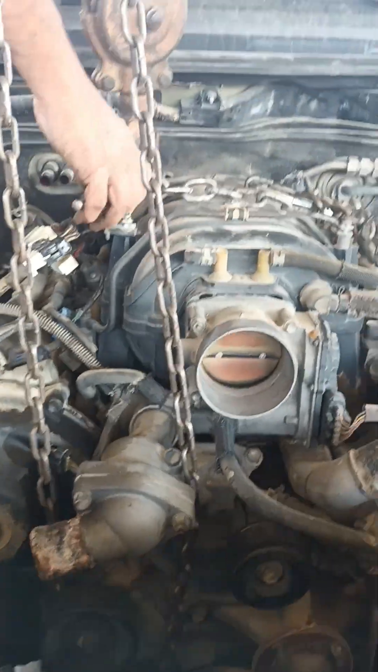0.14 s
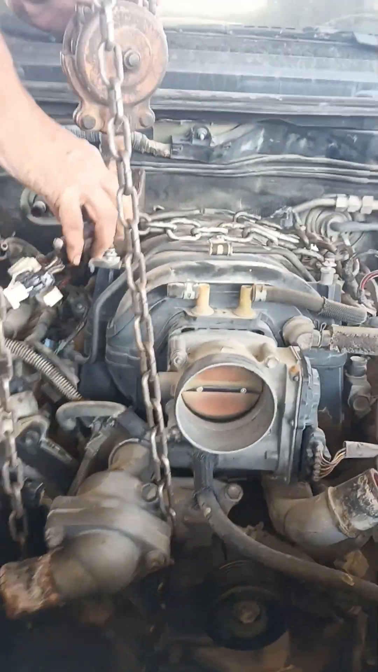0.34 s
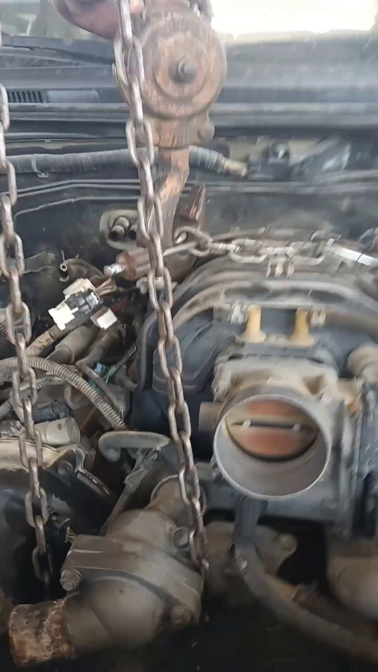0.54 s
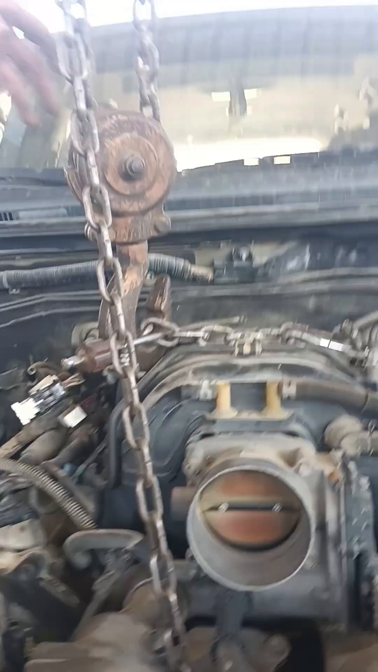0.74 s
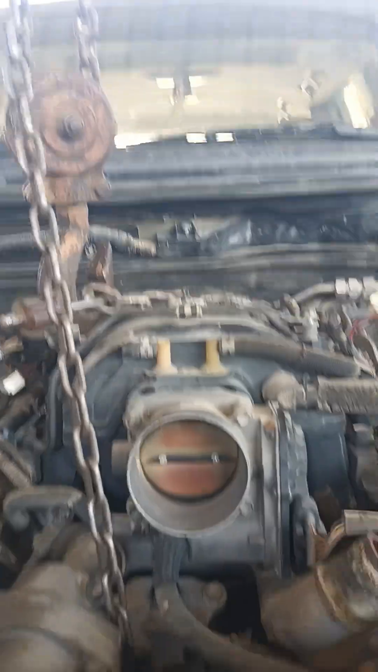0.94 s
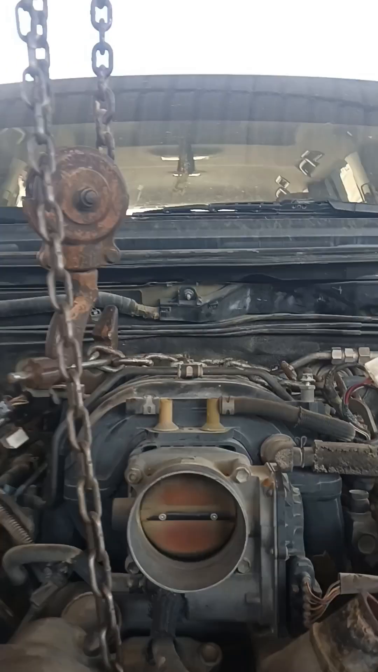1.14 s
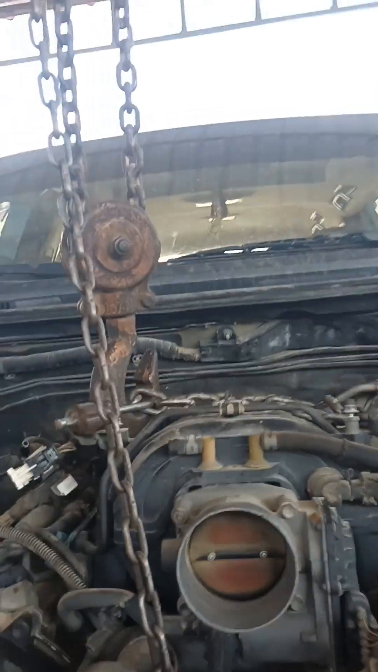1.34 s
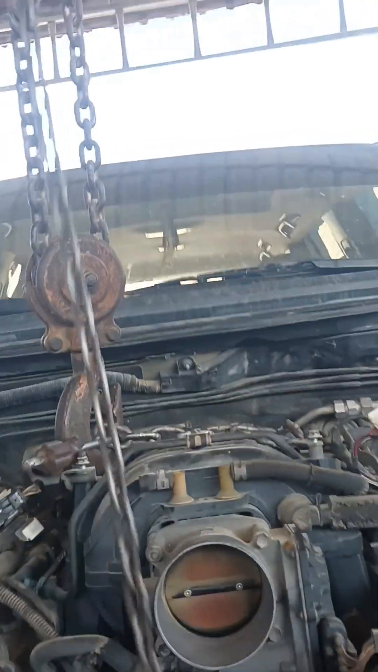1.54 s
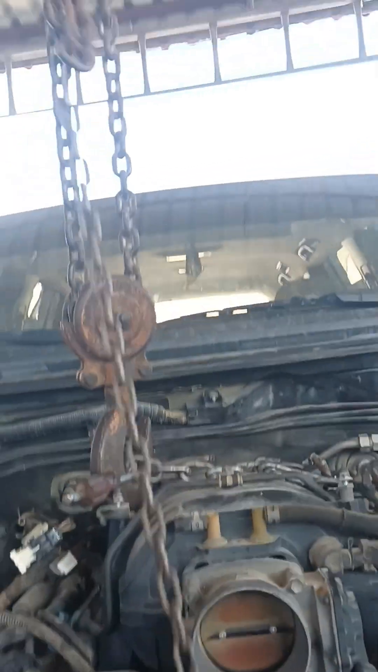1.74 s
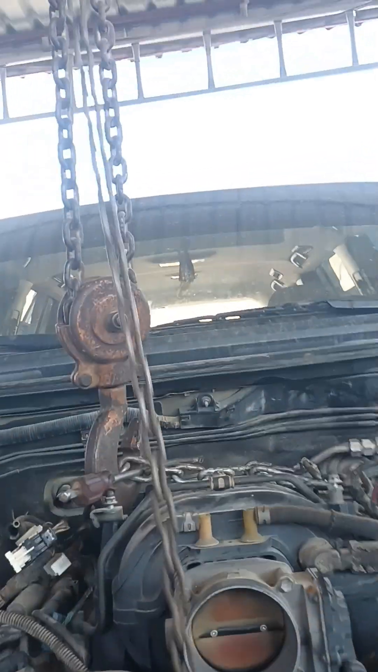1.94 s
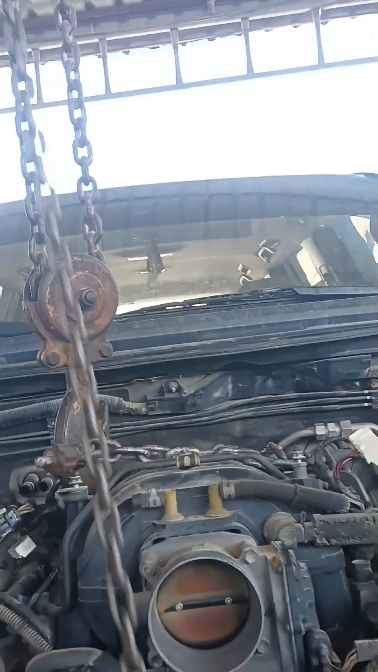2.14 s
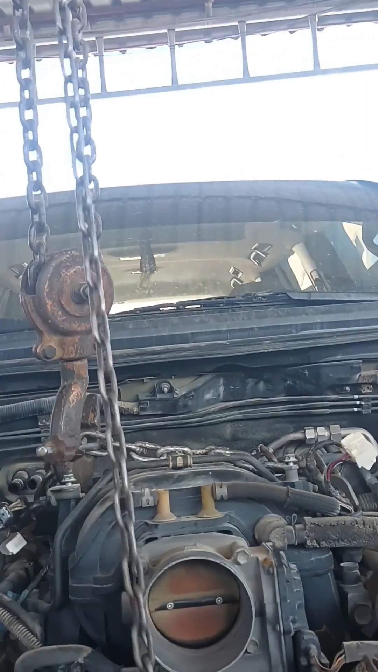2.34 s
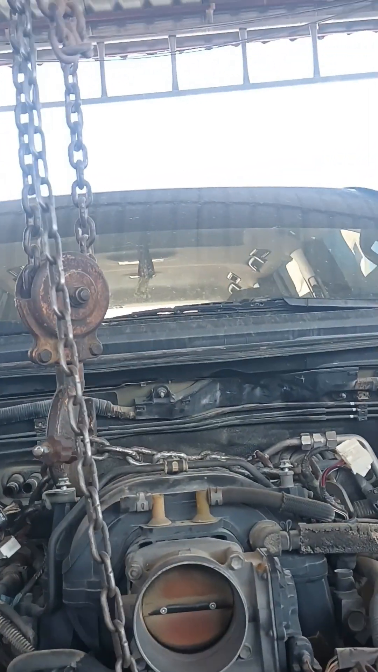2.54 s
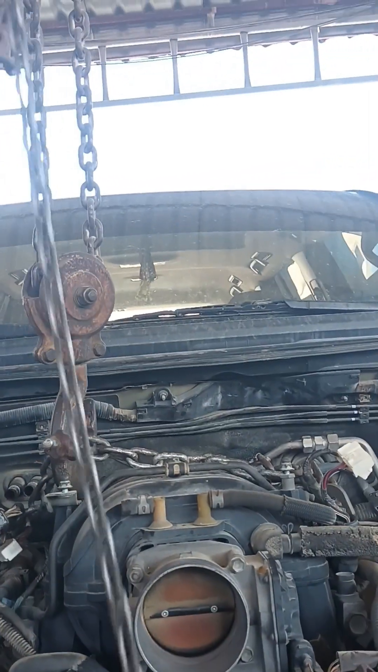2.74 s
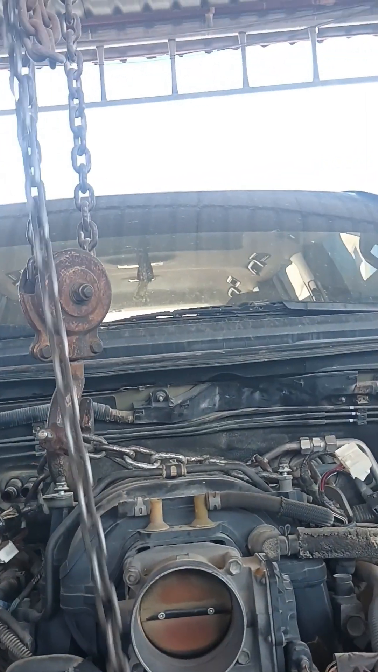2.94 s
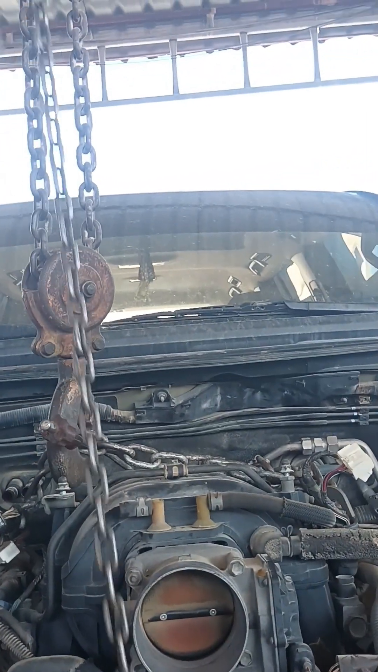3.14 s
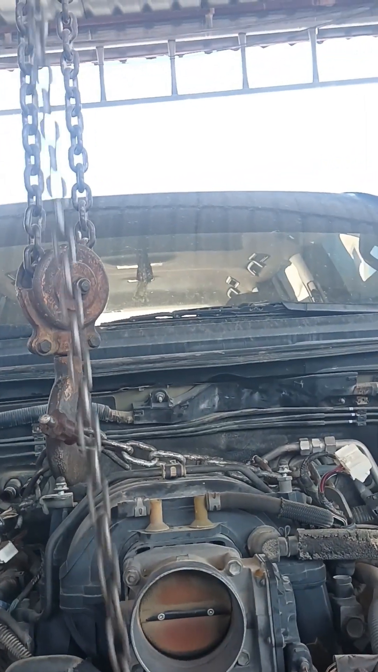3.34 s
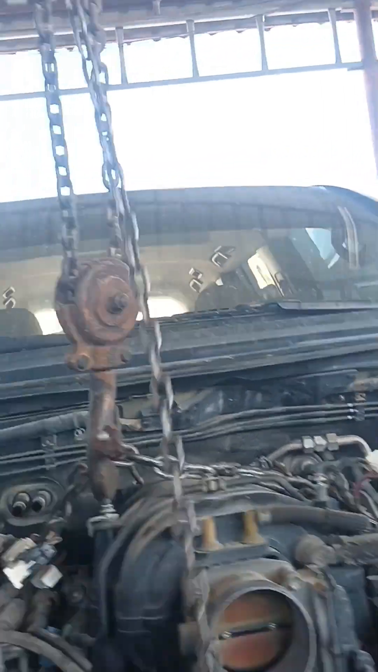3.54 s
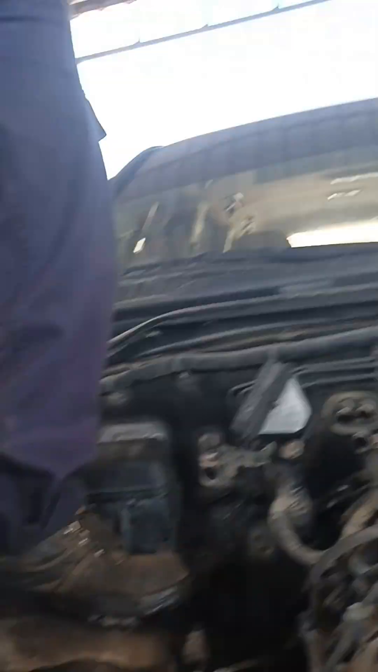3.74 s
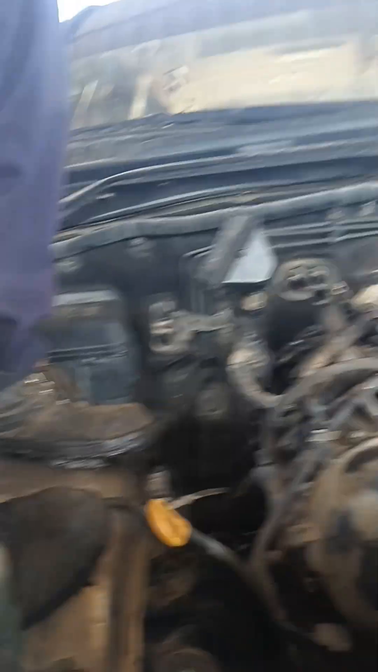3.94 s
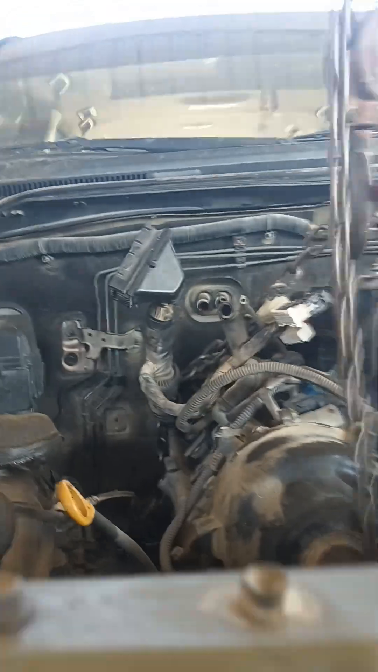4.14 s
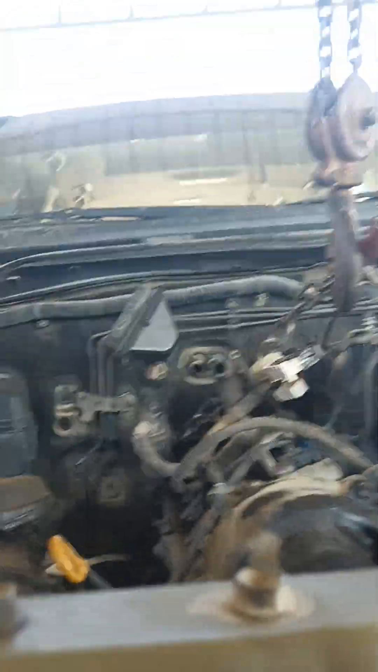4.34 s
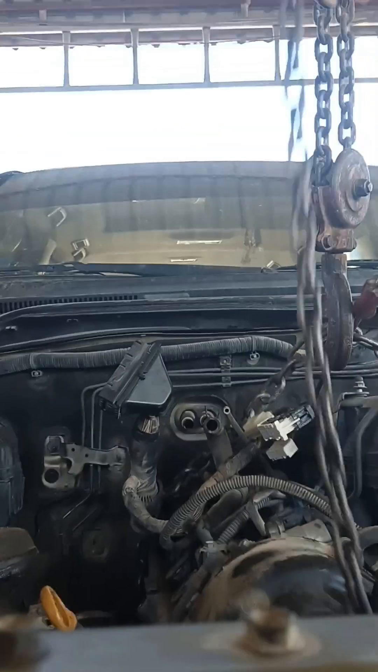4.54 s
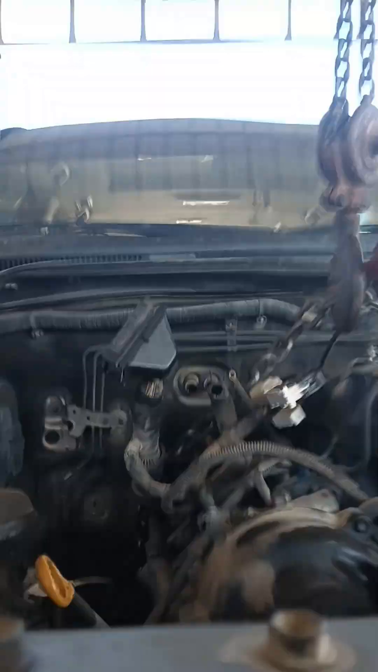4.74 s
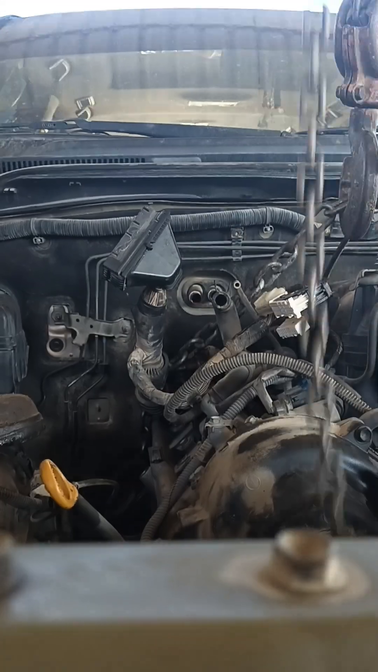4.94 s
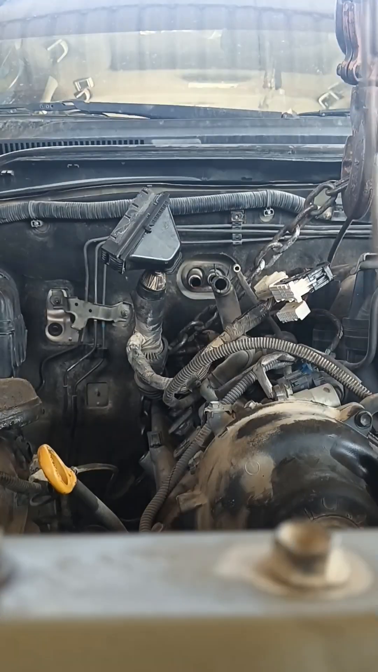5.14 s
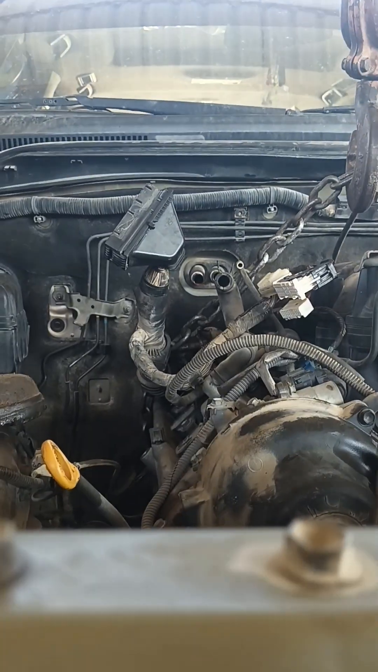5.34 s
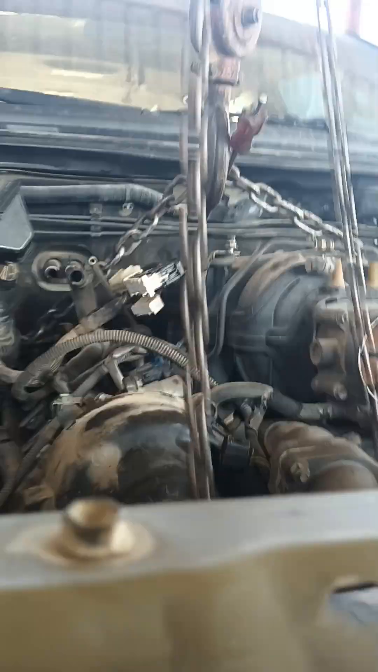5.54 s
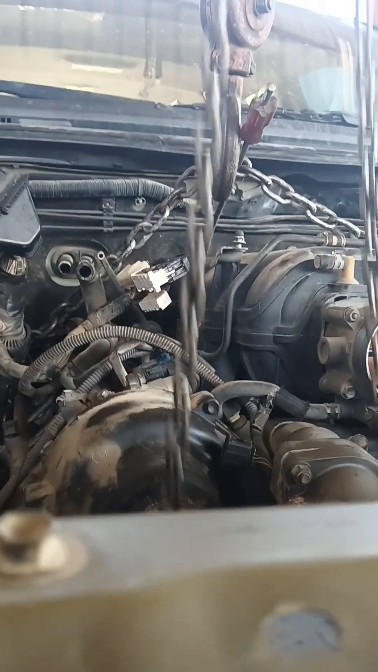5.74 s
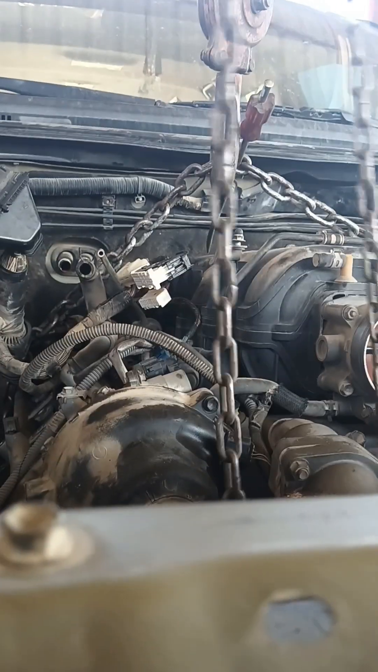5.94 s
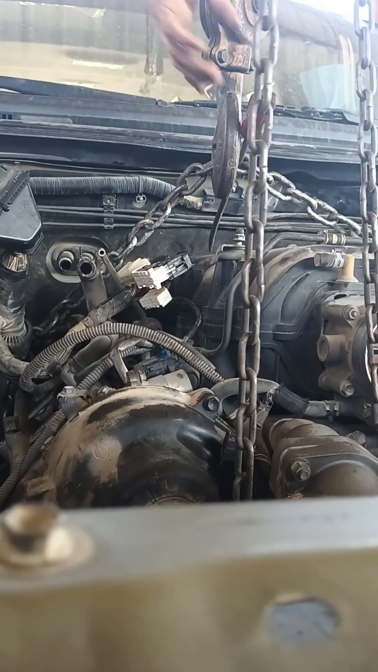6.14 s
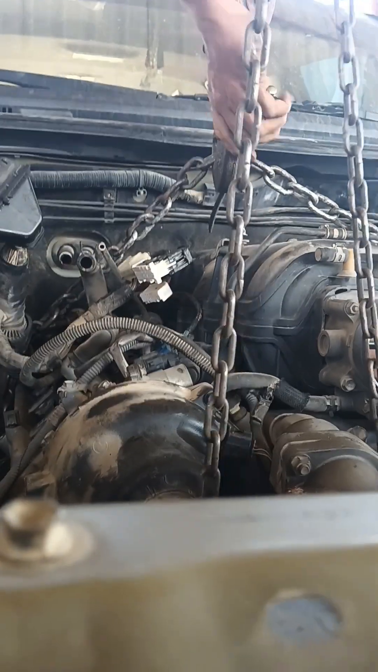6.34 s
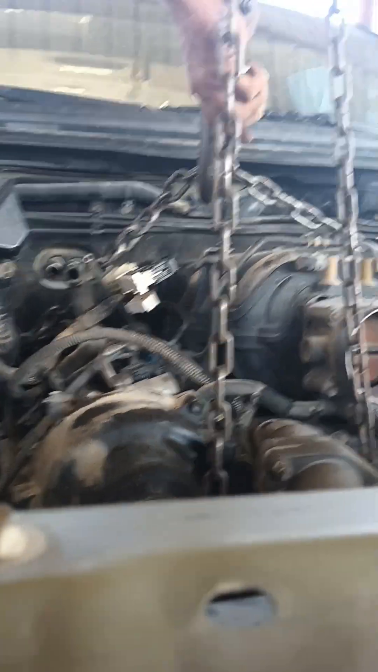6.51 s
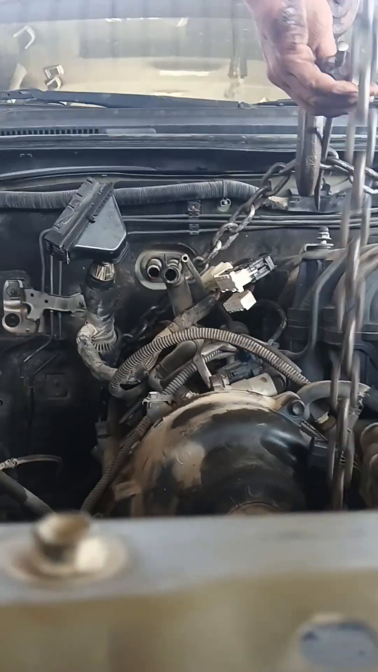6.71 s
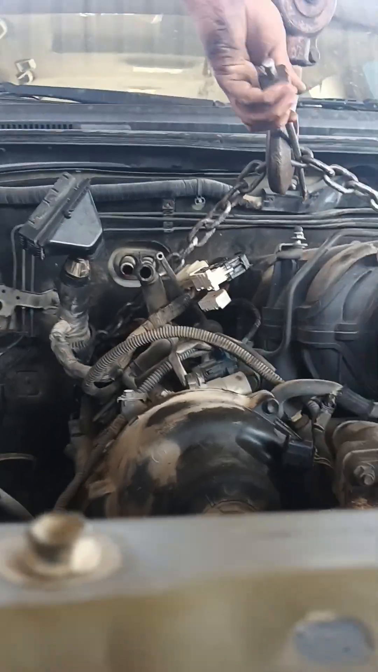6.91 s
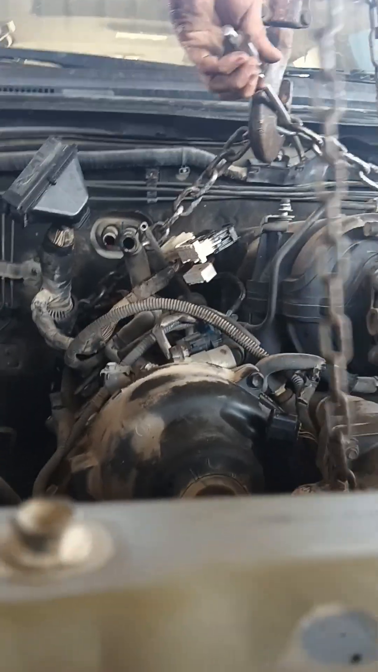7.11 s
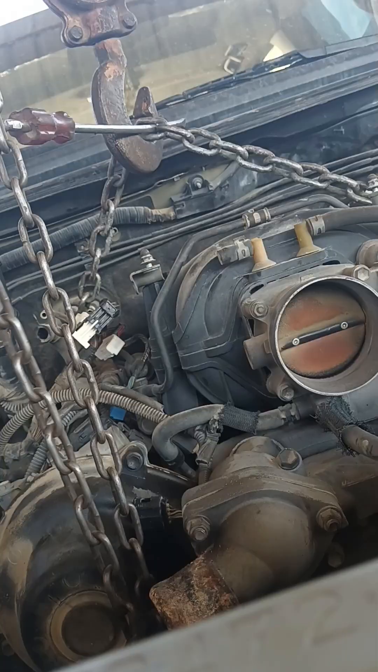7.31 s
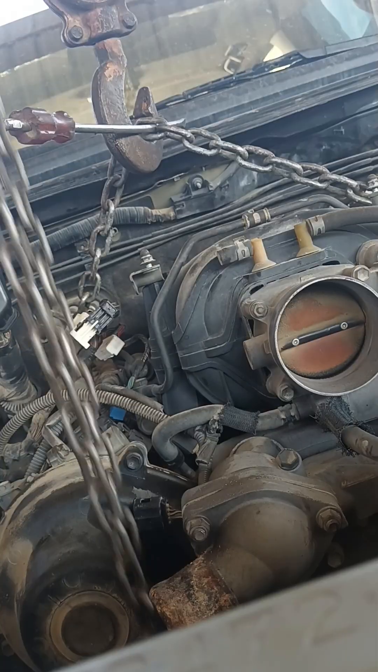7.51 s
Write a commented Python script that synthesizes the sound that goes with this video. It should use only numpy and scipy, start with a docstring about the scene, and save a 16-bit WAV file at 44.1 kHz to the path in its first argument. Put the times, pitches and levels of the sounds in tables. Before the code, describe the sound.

Close stereo sound in a hard, tin-roofed workshop, faint air noise beneath, most metal leaning left. From 0 to 0.9 s it is nearly quiet: a tiny link snap, a soft scrape, a faint knock. Around 0.9-1.3 s links snap and a hollow clack with a low thump lands near 1.17. From 1.4 to 2.1 s loose chain jingles, steel rings and the engine is knocked. Between 2.2 and 6 s uneven pulls, roughly three or four a second, bring dense rattling, boxy housing boom, bright jingling, hard clinks and thin high ratchet pings. Strong, clear steel rings bloom at 4.43 and 4.96 s; hollow clacks cluster at 5.45-5.65. After 6 s it falls away to a knock at 6.39, light scrapes, and pings and clinks at 6.7-7.15. Complete silence from 7.19 to 7.41, then air returns with a sharp double clink at 7.53-7.57 and light jingling.

```python
"""In a tin-roofed workshop, a hand chain hoist is hauled over an open engine bay.
Each pull drags the chain through the hoist: random link collisions set housing and guide clattering.
Loose links jingle, snap and scrape as decaying modes and short noise; struck steel and the pawl ring.
Chain and hook knock on the engine with hollow clacks and low thumps, over near echoes and faint air noise.
Near the end the sound breaks off for a moment."""
import sys
import numpy as np
from scipy import signal
from scipy.fft import rfft, irfft, next_fast_len
from scipy.io import wavfile
from scipy.ndimage import uniform_filter1d

SR = 44100
rng = np.random.default_rng(int(sys.argv[2]) if len(sys.argv) > 2 else 0)


def master(y):
    """Save y as 16-bit WAV."""
    cut = np.clip(np.atleast_2d(y).T, -1, 1)
    pcm = np.round(cut * 32767)  # scale
    wavfile.write(sys.argv[1], SR, pcm.astype(np.int16))


N = 338247
TIME = np.arange(N) / SR
SLOW_TIME = TIME[::50]  # coarse clock for slow gains
TAIL, LONG_TAIL = TIME[:SR // 7], TIME[:SR // 2]
BLOW_VARIETY_DB = 1.5  # spread of a mode's level from blow to blow

# colour of loose links touching: (frequency [Hz], relative level per Hz [dB])
LINK_COLOUR = [(1500, -16.5), (3200, -8.5), (4400, -9.5), (5400, -6.5), (6400, -3), (7300, -3),
               (8200, -13.5), (9200, 0), (10200, 0), (11300, -5), (13000, -16), (14000, -18), (15000, -12),
               (16000, -11.5)]


def pulling():
    """A jerk sets the links jingling; guide and housing go on while the hand hauls. Gives effort and three gains."""
    # pulls on the chain, and at 2.995 s a knock that shakes it the same way: (time [s], rise [s], hold [s],
    # then relative levels of rattle [dB], housing boom [dB], link jingle [dB])
    pulls = [(2.211, 0.036, 0.019, -37, -44, -43), (2.453, 0.023, .08, -30.5, -29.5, -30.5),
             (2.769, 0.0075, 0.11, -32, -39.5, -30.5), (2.995, .03, 0.037, -43.5, -62.5, -45),
             (3.328, 0.053, 0.079, -34.5, -38, -33.5), (3.691, 0.04, 0.051, -36, -39.5, -35.5),
             (3.868, 0.023, 0.023, -40.5, -58, -40), (4.007, 0.0093, 0.14, -31.5, -33.5, -30.5),
             (4.262, 0.023, 0.052, -33, -33.5, -38), (4.517, 0.017, 0.092, -33, -34, -32),
             (4.759, 0.014, 0.062, -33, -32.5, -35), (5.014, 0.01, 0.078, -33.5, -31.5, -35),
             (5.407, 0.058, 0.07, -35, -25.5, -40), (5.581, .012, 0.086, -35.5, -33, -31),
             (5.905, .012, .065, -33, -31, -32)]
    rattle_fall, boom_fall, jingle_fall = 171.5, 159.5, 189.5  # dB per s
    boom_lag = 0.0083  # s; the heavy housing takes longer to get going
    efforts, rattles, booms, jingles = [], [], [], []
    for s, rise, hold, rattle_db, boom_db, jingle_db in pulls:
        effort = swell(s, rise, hold, rattle_fall)
        efforts.append(effort)
        rattles.append(from_db(rattle_db) * effort)
        booms.append(from_db(boom_db) * swell(s, rise + boom_lag, hold - boom_lag, boom_fall))
        jingles.append(from_db(jingle_db) * swell(s, rise, 0, jingle_fall))
    return [together(swells) for swells in (efforts, rattles, booms, jingles)]


def swaying():
    """The slack chain swings and feeds on, then settles. Gives the gains of rattle, jingle and taut link."""
    # swings of the slack chain: (time [s], length [s], then relative levels of
    # rattle [dB], link jingle [dB], taut link [dB])
    sways = [(0.024, 0.069, -66.5, -92, -90), (0.361, .15, -61, -63, -85), (0.548, 0.093, -71, -66.5, -82),
             (0.838, 0.13, -56.5, -70, -72), (0.991, 0.24, -56, -69.5, -67.5),
             (1.396, 0.58, -45.5, -40, -51.5), (1.987, 0.14, -49, -53, -64), (2.125, 0.22, -51, -45, -52),
             (2.631, 0.48, -44.5, -43.5, -45.5), (3.186, 0.33, -50, -46, -49),
             (3.583, 0.087, -42.5, -49, -36.5), (3.772, 0.25, -43.5, -47.5, -47),
             (4.143, 0.25, -42, -45.5, -35), (4.598, 0.38, -47, -49, -44), (5.15, 0.24, -47, -48, -40.5),
             (5.613, 0.12, -50, -44.5, -30), (5.774, 0.22, -58.5, -54, -72), (6.12, .17, -69.5, -71, -90),
             (6.672, 0.32, -54, -50.5, -47.5), (7.4, 0.067, -62.5, -90, -85),
             (7.482, 0.2, -41, -42.5, -45.5)]
    rise, fall = 0.031, 419  # s, dB per s
    starts, lengths, *levels = np.transpose(sways)
    shapes = np.array([swell(s, rise, length - rise, fall) for s, length in zip(starts, lengths)])
    return [together(from_db(db)[:, None] * shapes) for db in levels]


def housing(run):
    """The hoist's steel housing booms at its low resonances under the running chain."""
    # resonances of the housing: (frequency [Hz], width [Hz], relative level [dB])
    housing_modes = [(312, 24, -15), (356, 20, -8), (435, 20, -5), (514, 16, 8), (662, 27, -9),
                     (790, 30, -11), (1020, 35, -14)]
    # broad colour of its clatter: (frequency [Hz], relative level per Hz [dB])
    boom_colour = [(100, -14), (200, -11.5), (310, 2.5), (520, -3.5), (800, -2.5), (1100, -26), (1600, 2),
                   (3000, -59)]
    return body(run, boom_colour, housing_modes, t60=0.049, ring_db=7.5, alike=0.63, vary_db=5.0, low_hz=203)


def guide(run):
    """The chain guide answers the same collisions higher up, as a rattle."""
    # resonances of the guide: (frequency [Hz], width [Hz], relative level [dB])
    guide_modes = [(1511, 24, -1.5), (1609, 24, 1.5), (1808, 22, 2.5), (2050, 55, -13.5), (2093, 55, -1),
                   (2253, 51, 1.5), (2506, 25, -5), (2890, 81, -7.5), (2826, 34, 2), (4900, 41, 3),
                   (7520, 90, -7)]
    # broad colour of its clatter: (frequency [Hz], relative level per Hz [dB])
    rattle_colour = [(500, 3), (900, 2), (1200, -3.5), (1700, 3), (3000, 3), (3800, 1), (5000, -3.5),
                     (6500, 0.5), (8200, -35.5), (10000, -9), (16000, -57)]
    return body(run, rattle_colour, guide_modes, t60=0.033, ring_db=-1.0, alike=0.03, vary_db=5.0, low_hz=480)


def body(clicks, colour, resonances, t60, ring_db, alike, vary_db, low_hz, count=9):
    """A steel part under the chain; as the point of contact wanders, its clatter and resonances shift."""
    out = 0
    place = np.cumsum(rng.random(N) < 25 / SR) % count  # moves about 25 times a second
    for k in range(count):
        clatter = rms_one(noise(colour, len(TAIL), alike) * decay(t60))
        ring = 0
        for hz, width, db in resonances:
            strength = from_db(db + vary_db * rng.normal()) * width
            ring_t60 = np.log(1000) / (np.pi * width)  # a narrow resonance rings longer
            ring = ring + strength * mode(hz + width * rng.normal() / 10, ring_t60)
        response = high_pass(clatter + from_db(ring_db) * rms_one(ring), low_hz)
        out = out + struck(clicks * (place == k), rms_one(response))
    return evened(out)


def jingle(per_s, spread_db, t60, tick_t60, tick_db, count=20):
    """Loose links chatter by turns; each has its own high modes and a hard tick."""
    out = 0
    colour_hz, colour_db = np.transpose(LINK_COLOUR)
    clicks = contacts(per_s, spread_db)
    touching = (np.cumsum(rng.random(N) < 40 / SR) + rng.integers(2, size=N)) % count
    for link in range(count):
        ring = 0
        for hz in np.linspace(3800, 15000, count) + rng.uniform(-300, 297, count):
            level_db = np.interp(hz, colour_hz, colour_db) + 3.8 * rng.normal()
            ring = ring + from_db(level_db) * mode(hz, t60)
        tick = noise(LINK_COLOUR, len(TAIL)) * decay(tick_t60)
        response = high_pass(rms_one(ring) + from_db(tick_db) * rms_one(tick), 1300)
        out = out + struck(clicks * (touching == link), response)
    return evened(out)


def clinks(strays, others_db, tick_db, tick_t60, rise):
    """A hard snap of two links: a tick, one strong mode and weaker ones around it."""
    # single links snapping together: (time [s], relative level [dB], strongest pitch [Hz])
    snaps = [(0.154, -39, 7330), (0.9176, -25.5, 4490), (0.9533, -20.5, 6260), (1.0153, -24.5, 6200),
             (1.0384, -27.5, 4410), (1.1353, -30.5, 5970), (1.2416, -41, 6760), (1.458, -22, 3400),
             (2.0193, -24.5, 3330), (2.0552, -25, 4350), (2.3234, -18, 3270), (2.7766, -16.5, 7520),
             (2.9117, -18.5, 7000), (3.241, -28, 7160), (3.501, -20, 4470), (3.625, -28, 4500),
             (3.6449, -14.5, 6240), (3.659, -20.5, 6420), (3.7046, -15, 6250), (3.7194, -17, 4900),
             (3.8015, -25, 6370), (3.8407, -26.5, 6390), (3.939, -21.5, 4470), (3.8803, -20, 6260),
             (4.6462, -20.5, 4470), (4.6865, -19, 5900), (4.7393, -19, 6390), (4.9418, -18.5, 5870),
             (5.1775, -21.5, 5970), (5.2235, -18, 4470), (5.2484, -19.5, 6220), (5.326, -22, 7400),
             (5.4522, -21.5, 6020), (5.5863, -19.5, 4470), (5.6885, -21, 4470), (6.4698, -38, 6230),
             (6.733, -37.5, 3420), (6.9205, -25, 7300), (6.968, -28, 3180), (7.001, -29, 4470),
             (7.5335, -14.5, 6250), (7.572, -16.5, 6370)]
    t60 = 0.044  # s
    out = np.zeros((2, N))
    for s, db, hz in list(snaps) + strays:
        pitches = (hz, 4450, 6300, 7200, 10100, 10800)
        others = sum(mode(f * rng.uniform(0.93, 1.03), t60) for f in pitches)
        tick = noise(LINK_COLOUR, len(TAIL)) * decay(tick_t60)
        snap = mode(hz, t60) + from_db(others_db) * others + from_db(tick_db) * tick
        add(out, s, from_db(db) * snap * build_up(rise))
    return out


def stray_clinks(sway, per_s=9, level_db=17.5, spread_db=-0.5, low_hz=2987, high_hz=6490):
    """Chance snaps, as strong as the chain swings: rows of (time [s], relative level [dB], pitch [Hz])."""
    at = np.flatnonzero(rng.random(N) < per_s / SR)
    strength, pitch = rng.random((len(at), 2)).T
    db = 20 * np.log10(sway[at] + 1e-9) + level_db + spread_db * (2 * strength - 1)
    return list(zip(at / SR, db, low_hz * (high_hz / low_hz) ** pitch))


def taut_link():
    """One taut link sings as its neighbours chafe it."""
    # modes of the taut link: (frequency [Hz], relative level [dB], t60 [s])
    taut_modes = [(4455, -12, 0.36), (4470, 9, 0.09), (6260, -8, .09), (6370, -4.5, .08)]
    return singing(taut_modes, per_s=45, spread_db=10.5, size=4500)


def load_hook():
    """The load hook sings while the chain chafes it."""
    # modes of the hook: (frequency [Hz], relative level [dB], t60 [s])
    hook_modes = [(3361, 0, .48), (5620, -13, .4), (7955, -20, .4)]
    # spells of chafing: (time [s], length [s], relative level [dB])
    chafes = [(1.383, 0.57, -44.5), (2.734, 0.24, -42.5), (4.428, .25, -34), (4.94, .14, -41)]
    rise, fall = 0.034, 173  # s, dB per s
    gain = together([from_db(db) * swell(s, rise, length - rise, fall) for s, length, db in chafes])
    return gain * singing(hook_modes, per_s=26, spread_db=8, size=1500)


def singing(modes, per_s, spread_db, size):
    """Light random touches keep a part's modes alive; the level is evened over size samples."""
    response = sum(from_db(db) * mode(hz, t60, LONG_TAIL) for hz, db, t60 in modes)
    response = response * build_up(0.00087, LONG_TAIL)
    return evened(struck(contacts(per_s, spread_db), response), size)


def ringing_steel():
    """Blows on the solid steel of the hoist excite its modes."""
    # blows: (time [s], relative level [dB], build-up [s], t60 [s])
    blows = [(1.402, -26.5, 0.013, 0.19), (1.540, -25.5, 0.00066, 0.67), (1.586, -21, 0.0011, 0.28),
             (1.76, -25.5, 0.012, 0.31), (1.805, -29.5, 0.0018, 0.24), (1.915, -23, 0.004, 0.13),
             (2.673, -35, 0.0035, 0.35), (2.732, -28.5, 0.0026, 0.15), (3.281, -18.5, 0.007, 0.078),
             (3.801, -23, 0.0009, 0.023), (4.4205, -13, 0.0023, 0.067), (4.445, -6, 0.058, 0.14),
             (4.955, -6.5, 0.029, 0.12)]
    # modes: (frequency [Hz], relative level [dB], ring time [multiple of the blow's t60], build-up [s])
    steel_modes = [(3361, -8, 1.8, .05), (5620, -6, 1.2, .001), (5873, 0, .9, .001), (5940, -9, .5, .001),
                   (7184, -13, 1, .001), (7955, -15, 1.3, .001), (8937, -16, .9, .001),
                   (12320, -24, 1, .001), (15055, -21, .8, .001)]
    return ringing(blows, steel_modes, BLOW_VARIETY_DB, flutter_db=2.5)


def pawl_pings():
    """The small hard pawl of the ratchet pings in a tight cluster of high modes."""
    # pings: (time [s], relative level [dB], t60 [s])
    ping_blows = [(1.4551, -23.5, 0.075), (2.131, -18, 0.11), (2.177, -16.5, 0.083), (2.2084, -18.5, 0.15),
                  (2.3565, -20.5, 0.11), (2.7387, -17, 0.1), (2.9617, -18.5, 0.083), (3.1288, -19, 0.17),
                  (3.5648, -16, 0.13), (3.7793, -20, 0.14), (3.8437, -18.5, 0.093), (4.812, -27, 0.27),
                  (4.8694, -24, 0.13), (5.1402, -18, 0.11), (5.1801, -22, 0.15), (5.3627, -20, 0.25),
                  (5.3994, -20.5, 0.12), (5.8122, -28.5, 0.26), (6.2856, -28, .049), (6.7244, -20, 0.08),
                  (6.777, -27.5, 0.45), (6.8239, -22.5, 0.096), (6.8748, -22, 0.11), (6.9406, -23.5, 0.11),
                  (7.1774, -29.5, .12)]
    # modes: (frequency [Hz], relative level [dB], ring time [multiple of the blow's t60], build-up [s])
    pawl_modes = [(9300, -1.5, 1, .001), (9390, -6.5, .5, .001), (9640, -5, 1, 0.00035),
                  (10260, -11.5, .8, 0.00034)]
    rise = 0.0062  # s
    blows = [(s, db, rise, t60) for s, db, t60 in ping_blows]
    return ringing(blows, pawl_modes, BLOW_VARIETY_DB, flutter_db=6)


def ringing(blows, modes, vary_db, flutter_db):
    """Struck steel rings on with a fluttering level; each blow weights the modes differently."""
    out = np.zeros((2, N))
    for s, db, rise, t60 in blows:
        t = LONG_TAIL[LONG_TAIL < 2 * t60]
        for hz, level, sustain, mode_rise in modes:
            flutter = np.cos(2 * np.pi * rng.uniform(14, 40) * t)
            strength = from_db(db + level + vary_db * rng.normal() + flutter_db * flutter)
            onset = build_up(rise, t) * build_up(mode_rise, t)
            add(out, s, strength * onset * mode(hz, t60 * sustain, t))
    return out


def knocks(rise, alike, thump_t60, tone_db, tone_sustain):
    """Covers and hoses answer a blow with a short, hollow clack, the engine with a thump."""
    # knocks of chain and hook on the engine: (time [s], relative clack level [dB], pitch [Hz],
    # t60 [s], relative thump level [dB], thump pitch [Hz])
    blows = [(0.308, -42.5, 339, 0.14, -56, 150), (0.938, -38, 750, 0.11, -72, 150),
             (1.064, -23, 757, 0.1, -54.5, 120), (1.174, -14.5, 1022, 0.034, -25.5, 127),
             (1.361, -28.5, 318, 0.025, -36, 177), (1.658, -29.5, 696, 0.19, -27.5, 240),
             (1.679, -19.5, 497, 0.025, -37, 198), (1.732, -32, 534, 0.066, -66, 230),
             (1.854, -41, 745, 0.094, -46, 170), (2.101, -43, 400, 0.043, -38, 158),
             (2.182, -30, 555, 0.3, -58, 238), (2.244, -25, 998, .08, -31.5, 210),
             (2.269, -24, 490, 0.071, -29.5, 230), (2.986, -20.5, 687, 0.17, -45, 221),
             (3.019, -19.5, 680, 0.071, -60, 220), (3.316, -21.5, 680, 0.12, -66, 200),
             (3.89, -25.5, 709, 0.35, -64, 200), (4.484, -33, 760, 0.12, -39, 191.6),
             (4.697, -18, 387, 0.082, -30.5, 230), (5.449, -24, 685, 0.2, -57, 180),
             (5.484, -20, 384, 0.31, -32, 170), (5.524, -27, 460, 0.06, -31.5, 141),
             (5.633, -24.5, 366.5, 0.26, -31.5, 160), (6.387, -29, 1060, 0.038, -36, 115),
             (6.525, -59, 399, 0.041, -42, 111), (6.63, -60, 400, .05, -58, 110),
             (7.098, -36.5, 670, 0.067, -52, 130), (7.576, -44, 393, .03, -44, 167)]
    # colour of the clack: (multiple of its pitch, relative level per Hz [dB])
    clack_colour = [(.1, -53), (.4, -13.5), (.8, -7.5), (1, 3.5), (1.25, -8), (2, -14), (4, -24), (12, -32),
                    (30, -69)]
    # the heavy engine's answer: (multiple of the thump's pitch, relative level per Hz [dB])
    thump_colour = [(.2, -31.5), (.5, -10.5), (1, 4.5), (1.9, -4.5), (3.5, -16.5), (7.7, -37), (23, -63.5),
                    (80, -86.5)]
    out = np.zeros((2, N))
    for s, db, hz, t60, thump_db, thump_hz in blows:
        clack = evened(noise(tuned(clack_colour, hz), len(TAIL), alike), size=200)
        hollow = clack * decay(t60) + from_db(tone_db) * mode(hz, t60 * tone_sustain)
        thump = evened(noise(tuned(thump_colour, thump_hz), len(TAIL), alike), size=400) * decay(thump_t60)
        add(out, s, (from_db(db - 3) * hollow + from_db(thump_db) * thump) * build_up(rise))
    return high_pass(out, 70)


def scrapes():
    """Brief sliding contacts as the chain is handled: smooth noise that swells and fades."""
    # scrapes: (middle [s], relative level [dB], half length [s], pitch [Hz])
    rubs = [(0.168, -52, 0.011, 2020), (0.473, -44, 0.027, 6430), (1.17, -40, .018, 5100),
            (1.363, -48, 0.0039, 6940), (2.33, -38.5, 0.0048, 3390), (6.531, -44, 0.0066, 2100),
            (6.635, -54.5, 0.0071, 3500), (6.769, -49, 0.0053, 2670), (7.096, -54, 0.0066, 2280)]
    # colour of a scrape: (multiple of its pitch, relative level per Hz [dB])
    rub_colour = [(.1, -9.5), (.4, -10), (.65, 0.5), (1.6, -1.5), (2.2, -11), (5, -26)]
    out, t = np.zeros((2, N)), TAIL - TAIL[-1] / 2
    for s, db, half, hz in rubs:
        rub = noise(tuned(rub_colour, hz), len(t))
        add(out, s + t[0], from_db(db) * rub * np.exp(-(t / half) ** 2))
    return out


def workshop(x, t60, wet_db):
    """A few near reflections and a weak diffuse tail from the workshop."""
    # hard surfaces near the chain: (delay [s], level [dB]); each side's delay varies by up to a fifth
    echoes = [(.0043, -12.5), (.011, -8.5), (.023, -18.5)]
    tail_colour = [(100, 4.5), (1000, -19.0), (6000, 7.5), (16000, -7.0)]  # (Hz, dB per Hz)
    tail = noise(tail_colour, len(LONG_TAIL)) * decay(t60, LONG_TAIL) * build_up(0.0058, LONG_TAIL)
    response = from_db(wet_db) * tail / np.sqrt(np.sum(tail ** 2) / 2)
    for delay, db in echoes:
        at = (delay * rng.uniform(.8, 1.2, 2) * SR).astype(int)
        response[[0, 1], at] += from_db(db)
    return x + signal.oaconvolve(x, response, axes=1)[:, :N]


def workshop_air():
    """Steady coloured noise: the air of the workshop around the microphones."""
    # colour of the air: (frequency [Hz], relative level per Hz [dB])
    air_colour = [(30, -7), (110, 0.5), (280, 5), (450, -3.5), (800, 0), (1500, -1), (2300, -6),
                  (5600, -10), (8000, -15.5), (10000, -6.5), (16000, -41)]
    return noise(air_colour, N, alike=0.12)


def from_db(db):
    """Decibels to gain."""
    return np.exp(np.asarray(db) * np.log(10) / 20)


def rms_one(x):
    """Scale to rms 1."""
    return x / np.sqrt(np.mean(x ** 2) + 1e-20)


def decay(t60, t=TAIL):
    """A fade of 60 dB in t60 seconds."""
    return np.exp(-np.log(1000) * t / max(t60, 1e-3))


def build_up(seconds, t=TAIL):
    """A smooth rise from nothing towards 1."""
    return 1 - np.exp(-t / max(seconds, 1e-4))


def swell(s, rise, hold, fall_db_per_s):
    """Gain that rises from time s, holds at 1 and dies away."""
    t = SLOW_TIME - s
    fall = from_db(-abs(fall_db_per_s) * np.maximum(t - rise - hold, 0))
    return np.clip(t / max(rise, 1e-3), 0, 1) * fall


def together(swells):
    """Overlapping movements add in power; one gain per sample."""
    return np.interp(TIME, SLOW_TIME, np.sqrt(np.sum(np.square(swells), axis=0)))


def add(out, s, sound):
    """Mix a stereo sound in at time s."""
    start = int(np.clip(s * SR, 0, N - 1))
    out[:, start:start + sound.shape[1]] += sound[:, :N - start]


def pan(x, left_db):
    """Make the left side louder than the right by left_db."""
    return x * from_db([[left_db / 2], [-left_db / 2]])


def tuned(colour, pitch_hz):
    """Place a colour given in multiples of a pitch at that pitch."""
    return [(pitch_hz * ratio, db) for ratio, db in colour]


def noise(spectrum, size, alike=0):
    """Stereo noise of a given colour, partly shared by both sides; rms 1."""
    hz, db = np.transpose(spectrum)
    white, share = rng.standard_normal((3, next_fast_len(size))), np.clip(alike, 0, 1)
    pair = np.sqrt(1 - share) * white[:2] + np.sqrt(share) * white[2]
    bins = np.fft.rfftfreq(pair.shape[1], 1 / SR)
    gain = from_db(np.interp(np.log(bins + 1), np.log(hz), db))
    return rms_one(irfft(rfft(pair) * gain, pair.shape[1])[:, :size])


def mode(hz, t60, t=TAIL):
    """A dying sine that reaches each side with a phase of its own."""
    return np.sin(2 * np.pi * (hz * t + rng.random((2, 1))), dtype=np.float32) * decay(t60, t)


def contacts(per_s, spread_db):
    """Link collisions at random moments, of uneven strength."""
    sizes = from_db(spread_db * np.minimum(rng.exponential(1, N), 4)) * rng.choice([-1, 1], N)
    return sizes * (rng.random(N) < per_s / SR)


def struck(clicks, response):
    """Every click sets the response sounding."""
    size = response.shape[1]
    out = np.zeros((2, N + size))
    for at in np.flatnonzero(clicks):
        out[:, at:at + size] += clicks[at] * response
    return out[:, :N]


def evened(x, size=1500):
    """Hold the slow level near 1 and keep the fine grain."""
    power = uniform_filter1d(uniform_filter1d(np.mean(x ** 2, axis=0), size), size)
    return x / np.sqrt(np.abs(power) + np.mean(power) / 1000)


def high_pass(x, hz):
    """Remove the lowest frequencies, below hz."""
    return signal.sosfilt(signal.butter(4, hz, "high", fs=SR, output="sos"), x)


def scene():
    """The same collisions shake housing and guide; most of the other layers lean to the left."""
    effort, pull_rattle, pull_boom, pull_jingle = pulling()
    sway_rattle, sway_jingle, sway_taut = swaying()
    boom_gain = np.hypot(pull_boom, from_db(-16) * sway_rattle)  # slack chain hardly shakes the housing
    rattle_gain = np.hypot(pull_rattle, sway_rattle)
    jingle_gain = np.hypot(pull_jingle, sway_jingle)
    taut_gain = np.hypot(from_db(-12.5) * pull_rattle, sway_taut)  # a pull also chafes the taut link

    # collisions at rest, and those a pull adds
    run = contacts(per_s=140 + 600 * effort, spread_db=1.5)
    links = jingle(per_s=180 + 600 * effort, spread_db=4.0, t60=0.075, tick_t60=0.037, tick_db=-4)
    snaps = clinks(stray_clinks(sway_rattle), others_db=-9.0, tick_db=-7, tick_t60=0.027, rise=0.0015)
    thuds = knocks(rise=0.002, alike=0.6, thump_t60=0.085, tone_db=-3, tone_sustain=1.3)

    hoist = pan(from_db(-0.5) * boom_gain * housing(run), left_db=3.25)
    hoist += pan(from_db(4.0) * rattle_gain * guide(run), left_db=-0.39)
    hoist += from_db(8.0) * jingle_gain * links
    hoist += pan(from_db(-1.5) * taut_gain * taut_link(), left_db=12)
    hoist += pan(from_db(0.5) * load_hook(), left_db=3.9)
    hoist += pan(from_db(-2.5) * snaps, left_db=7.9)
    hoist += pan(from_db(4.5) * ringing_steel(), left_db=7.9)
    hoist += pan(from_db(-3.5) * pawl_pings(), left_db=17.7)
    hoist += pan(from_db(-0.5) * thuds, left_db=5)
    hoist += pan(scrapes(), left_db=12.0)
    return workshop(hoist, t60=0.43, wet_db=-24.0) + from_db(-61.5) * workshop_air()


def record(dry):
    """The sound breaks off briefly; a steep low-pass cuts the top."""
    # the silent gap: (start [s], end [s])
    silence = (7.188, 7.408)
    cutoff_hz = 15600
    sounding = 1.0 * ((TIME < silence[0]) | (TIME > silence[1]))
    live = uniform_filter1d(sounding, size=200)  # softened edges
    low_pass = signal.ellip(10, .1, 80, cutoff_hz, fs=SR, output="sos")
    return signal.sosfilt(low_pass, dry * live)


dry = scene()
out = record(dry)
master(out)
```